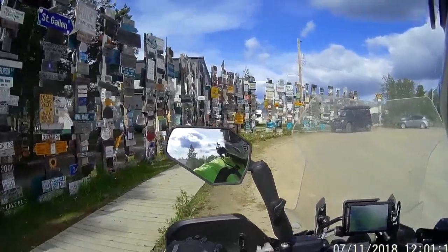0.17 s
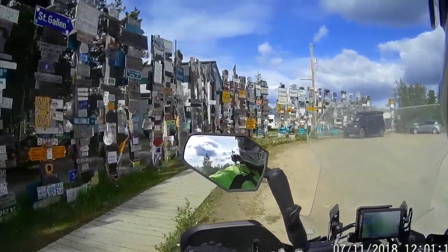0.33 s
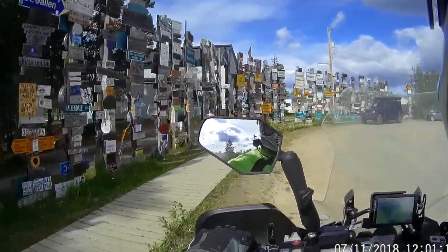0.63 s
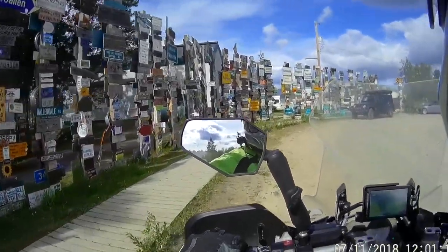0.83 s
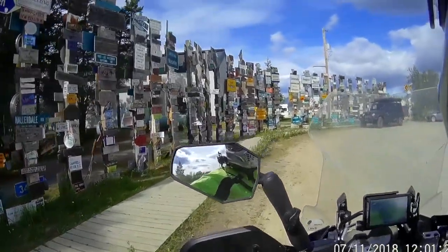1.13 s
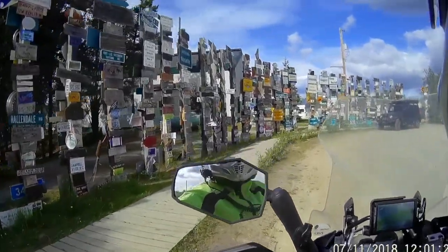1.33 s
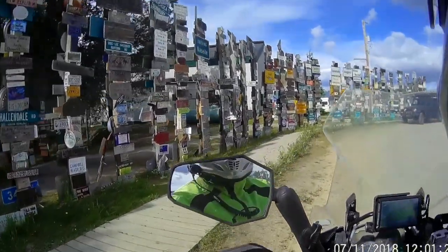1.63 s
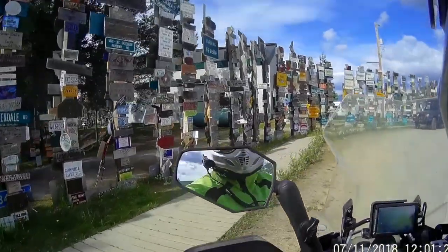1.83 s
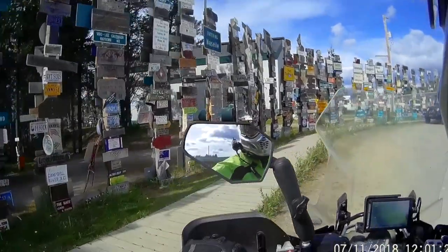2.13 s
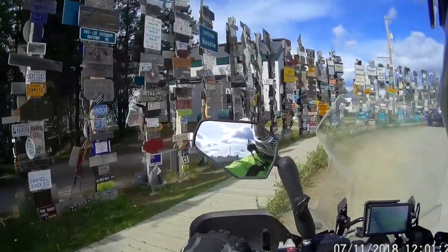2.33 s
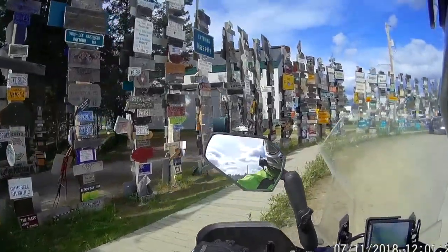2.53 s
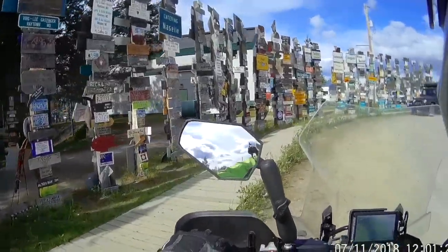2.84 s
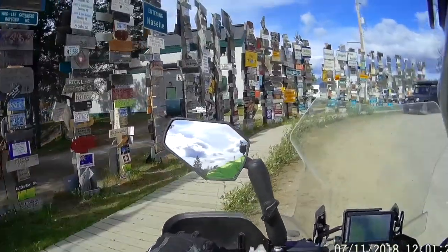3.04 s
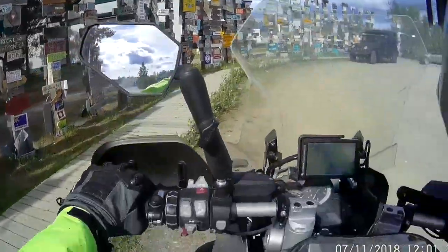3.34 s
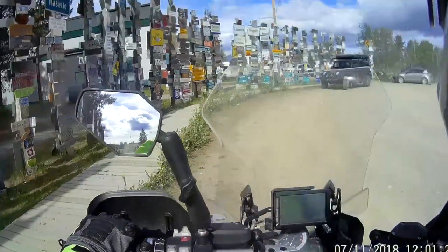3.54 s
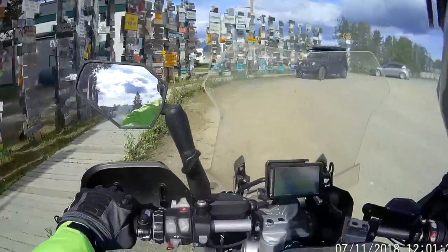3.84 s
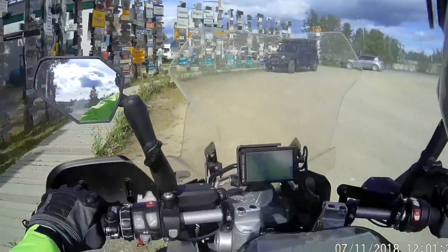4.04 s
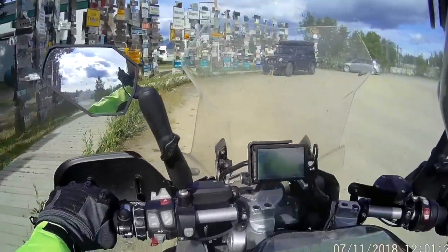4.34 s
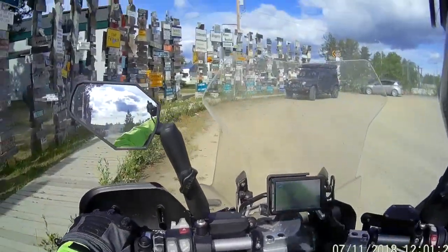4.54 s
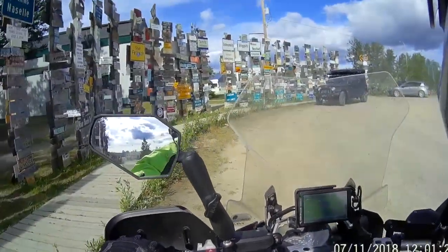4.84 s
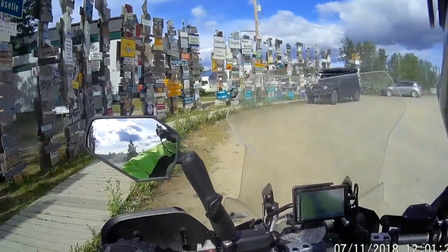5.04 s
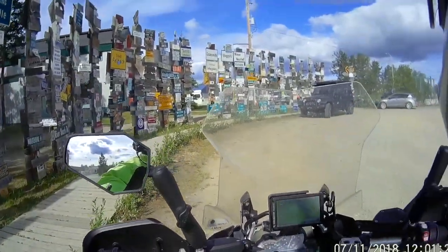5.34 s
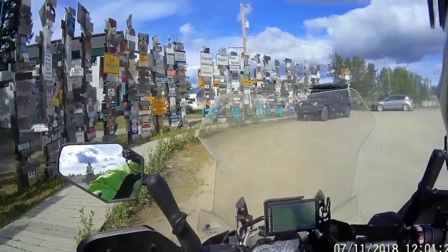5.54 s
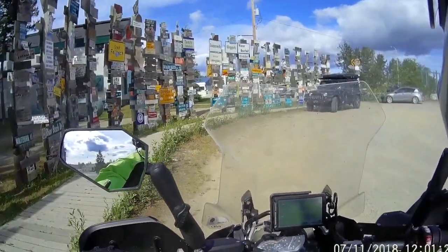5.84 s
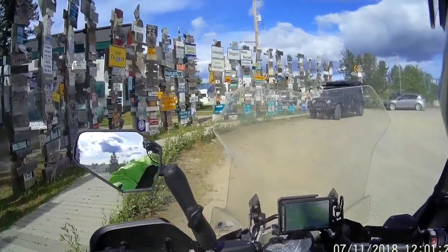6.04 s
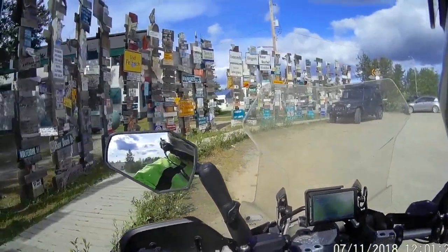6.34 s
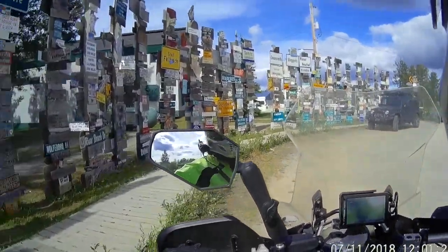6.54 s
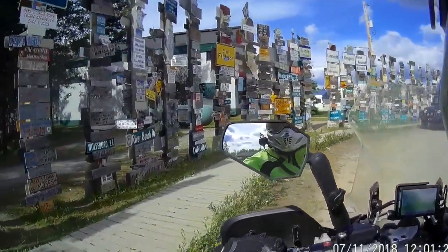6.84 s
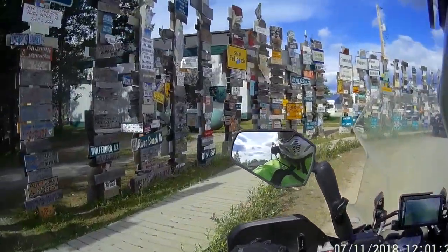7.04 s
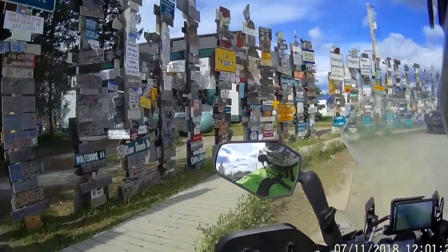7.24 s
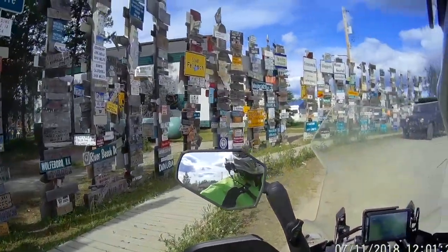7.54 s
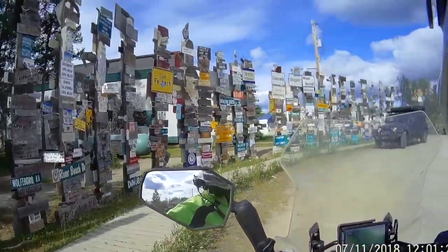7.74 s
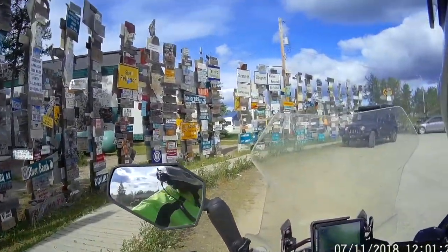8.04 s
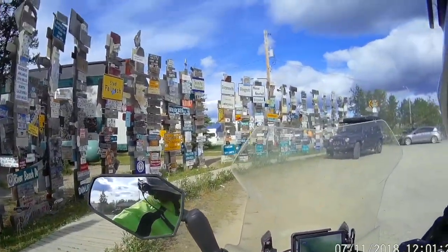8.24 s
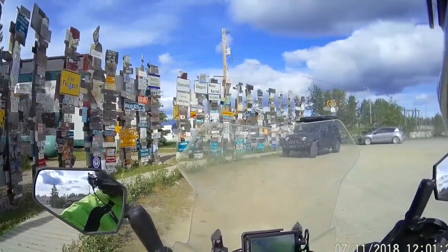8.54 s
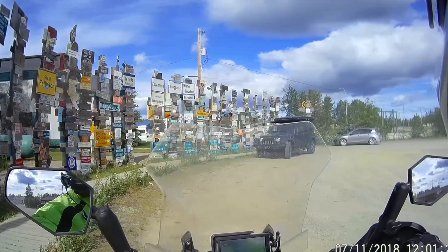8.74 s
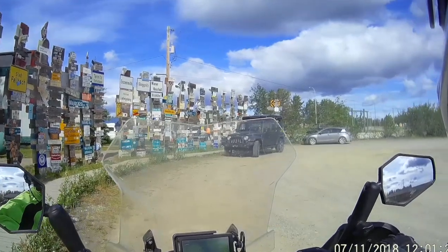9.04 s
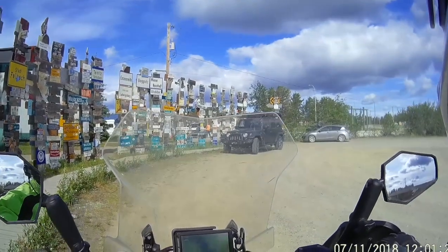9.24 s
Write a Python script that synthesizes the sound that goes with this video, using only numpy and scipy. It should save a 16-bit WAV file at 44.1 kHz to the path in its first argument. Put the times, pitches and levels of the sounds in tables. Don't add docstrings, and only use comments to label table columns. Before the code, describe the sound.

A twin-cylinder motorcycle idles close below a cased helmet microphone outdoors: soft bassy exhaust puffs around nineteen a second, airbox gulps, valve clatter, thin gear whine and rattling fins. Light wind buffets low. After six seconds comes one small blip; near the end the ignition is cut, the engine quickly runs down, and faint bumps fade into hiss.

```python
import sys
import numpy as np
from scipy import signal
from scipy.fft import rfft, irfft, next_fast_len
from scipy.io import wavfile
from scipy.ndimage import uniform_filter1d, map_coordinates

SR = 44100
rng = np.random.default_rng(int(sys.argv[2]) if len(sys.argv) > 2 else 0)


def gain_from_db(level_db):
    decades = np.asarray(level_db, float) / 20
    return 10 ** decades


def generate_wav(signal):
    frames = np.transpose(np.atleast_2d(signal))
    scaled = np.clip(frames, -1, 1) * 32767
    pcm = np.round(scaled).astype(np.int16)
    wavfile.write(sys.argv[1], SR, pcm)


N = 413658


def unit(x):
    return x / np.sqrt(np.mean(x ** 2) + 1e-20)


def curves(rows):
    s, *columns = np.transpose(rows)
    return [np.interp(np.arange(N) / SR, s, c, left=-120, right=-120) for c in columns]


def spells(rows):
    t = np.arange(N) / SR
    return sum(db * np.exp(-.5 * ((t - s) / length) ** 2) for s, db, length in rows)


def wobble(rate):
    knots = rng.standard_normal(int(N * rate / SR) + 4)
    return map_coordinates(knots, [np.arange(N) * rate / SR])


def filtered(x, response):
    m = next_fast_len(N + SR // 2)
    hz = np.fft.rfftfreq(m, 1 / SR) + 1e-3
    return irfft(rfft(x, m) * response(hz), m)[:N]


def coloured(points):
    f, db = np.transpose(points)
    gain = lambda hz: gain_from_db(np.interp(np.log(hz), np.log(f), db, left=-120, right=-120))
    return unit(filtered(rng.standard_normal(N), gain))


def resonated(x, modes):
    def body(f):
        total = 0
        for k, (centre, width, db) in enumerate(modes):
            ring = 1j * f * width / (centre * centre - f * f + 1j * f * width)
            total = total + (-1) ** k * gain_from_db(db) * ring
        return total
    return unit(filtered(x, body))


def steep(ratio, order):
    poles = [np.exp(1j * np.pi * (2 * k + order + 1) / (2 * order)) for k in range(order)]
    return 1 / np.prod([1j * ratio - pole for pole in poles], axis=0)


# start_s, crank_turns_per_s
SPEED = [(0.0, 19.196), (1.28, 18.844), (1.57, 19.948), (1.85, 18.327), (1.99, 19.605), (2.42, 18.937),
         (2.71, 19.434), (3.99, 18.829), (4.13, 20.841), (4.27, 19.359), (5.13, 19.902), (5.27, 16.371),
         (5.55, 19.965), (6.12, 18.043), (6.26, 19.744), (7.69, 18.989), (7.83, 19.259), (8.4, 19.011)]
START_TURN = -.512
BLIP_S, CLUTCH_S, BLIP_GAIN = 6.368, 6.569, 31.54
OFF_S, COAST_S, COAST_BEND = 8.305, .473, 2.863


def shaft():
    t = np.arange(-SR // 10, N) / SR
    blip = BLIP_GAIN * (t - BLIP_S) * (t > BLIP_S) * (t < CLUTCH_S)
    coast = 1 - np.clip((t - OFF_S) / COAST_S, 0, 1) ** COAST_BEND
    speed = (np.interp(t, *np.transpose(SPEED)) + blip) * coast
    turns = np.cumsum(speed) / SR
    return t, turns - turns[SR // 10] + START_TURN


def crank():
    s, turns = shaft()
    return uniform_filter1d(np.interp(np.arange(N) / SR, s, turns), size=2500)


def beats(angle, every, scatter_db, jitter_s=0):
    s, turns = shaft()
    at = np.interp(np.arange(angle % every - every, turns[-1], every), turns, s)
    size, late = rng.standard_normal((len(at), 2)).T
    at = at + jitter_s * late
    heard = at >= 0
    return np.bincount((at[heard] * SR).astype(int), gain_from_db(scatter_db * size)[heard], 2 * N)[:N]


def strikes(events, scatter_db, jitter_s):
    return sum(gain_from_db(db) * beats(angle, 2, scatter_db, jitter_s) for angle, db, _ in events)


def cam_gate(events, scatter_db, between_db):
    gate = np.full(N, gain_from_db(between_db))
    for angle, db, t60 in events:
        fall = gain_from_db(-60 / (t60 * SR))
        gate += gain_from_db(db) * signal.lfilter([1], [1, -fall], beats(angle, 2, scatter_db))
    return gate


def whine(order, ripple, blur, unloading):
    angle = crank()
    surge = -ripple / (2 * np.pi) * np.sin(2 * np.pi * (angle - .45))
    contact = 1 - unloading * np.exp(8 * (np.cos(2 * np.pi * (angle - .27)) - 1))
    load = contact * (1 + .3 * np.cos(np.pi * (angle - 1.9))) * gain_from_db(.8 * wobble(30))
    return unit(load * np.sin(2 * np.pi * order * (angle + surge) + blur * wobble(45)))


def exhaust():
    ahead = lambda x, s: np.roll(x, -round(s * SR))
    puffs = ahead(beats(0, 1, scatter_db=.8), .011) + .28 * beats(.28, 1, scatter_db=1.3)
    jolts = ahead(beats(0, 1, scatter_db=1), .0207)
    shake = filtered(jolts, lambda f: 23.5j * f / (62.7 ** 2 - f * f + 23.5j * f))

    def edges(hz):
        muffler = steep(hz / 104.8, 6) / (1 + (hz / 156) ** 12)
        microphone = np.conj(steep(35.4 / hz, 4))
        return muffler * microphone
    return unit(filtered(puffs + .96 * shake, edges))


# turns_after_puff, level_db, t60_s
INTAKE = [(.76, 0, .06), (1.76, -2.5, .06), (.25, -7, .07), (1.3, -10, .07)]
# centre_hz, width_hz, level_db
AIRBOX = [(212.3, 45.93, 0), (254.27, 60.5, -0.5), (298.4, 60.6, -5.5), (390.5, 65.8, -7.5),
          (469.5, 34.6, -4.5), (518.7, 60.8, -11)]


def intake():
    breath = resonated(cam_gate(INTAKE, 1.0, between_db=-9) * rng.standard_normal(N), AIRBOX)
    gulps = resonated(strikes(INTAKE, .8, .0006), AIRBOX[:3])
    throttle_db = .8 * np.clip(np.gradient(crank()) * SR - 19.8, 0, 5)
    return gain_from_db(throttle_db) * unit(breath + .85 * gulps)


# centre_hz, width_hz, level_db
PANEL = [(423.73, 18.8, 1), (452.5, 24.5, -8), (508.6, 12, -14)]


def panel():
    kicks = beats(.9, 2, .8, .0003) + .45 * beats(1.62, 2, 1.5, .0008)
    swells = resonated(resonated(kicks, [(432, 60, 0)]), PANEL)
    cam_drive = resonated(whine(order=22, ripple=.015, blur=.4, unloading=.2), PANEL)
    shaking = resonated(rng.standard_normal(N), PANEL)
    return unit(swells + .75 * cam_drive + .3 * shaking)


# start_s, share (0-1)
FACING = [(0, 0.24), (3.3, 0.68), (3.8, 0.76), (5.1, 0.72), (5.6, 0.59), (9.38, 0.16)]


def facing():
    return np.clip(curves(FACING)[0], 0, 1)


# turns_after_puff, level_db, t60_s
VALVES = [(.37, 0, .07), (1.38, -4, .07), (.7, -6, .09), (1.7, -5, .09)]
# centre_hz, width_hz, level_db
CASES = [(713.6, 180, -13), (924.2, 106.9, -6), (1102.8, 46.5, -2.5), (1207.7, 44.1, -4), (1361, 226, -11),
         (1655, 127.2, -10), (1882, 130, -10), (2194, 217, -15)]
COVER = [(1108, 55, 0), (1420, 200, -14)]
HOUSING = [(1190, 330, 0), (1420, 150, -3)]
KNOCK_FACING_DB, WHINE_FACING_DB = 3.5, -6


def cases(gate):
    turned = facing() - .4
    clatter = resonated(gate * rng.standard_normal(N), CASES)
    knock = resonated(strikes(VALVES[:2], 1.1, .0004), COVER)
    primary = resonated(whine(order=60, ripple=.045, blur=.6, unloading=.85), HOUSING)
    return (gain_from_db(-3.4) * clatter
            + gain_from_db(-8.1 + KNOCK_FACING_DB * turned) * knock
            + gain_from_db(-5.9 + WHINE_FACING_DB * turned) * primary)


# pitch_hz, level_db
FINS = [(1410, -41.5), (2550, -6), (3090, 0), (3400, -7), (3860, -6.5), (6300, -14), (12600, -14.5),
        (14200, -22.5)]
# centre_hz, width_hz, level_db
BRIGHT_SIDE = [(3756, 230, 5), (4582, 220, -6)]


def fins(gate):
    bright = resonated(rng.standard_normal(N), BRIGHT_SIDE)
    metal = coloured(FINS) + 0.515 * facing() * bright
    return unit((gate + 1.6) * gain_from_db(1.26 * wobble(60)) * metal)


# start_s, effort_db
LOAD = [(0, -0.5), (.3, -0.5), (1.45, -0.12), (1.64, 5), (1.8, 0), (2.55, 0), (2.7, 5), (2.9, 3),
        (3.25, -0.04), (4.0, 0.46), (4.6, 1), (5.13, 0.52), (5.32, -3.5), (5.6, 0), (6.6, 0.84),
        (7.35, 0.93), (8.0, 0.39), (8.5, -0.5)]
# centre_s, level_db, length_s
MIXTURE = [(0.037, 3, 0.037), (0.193, -2.5, 0.048), (0.978, -2, 0.038), (1.825, -1.5, 0.04033),
           (2.326, -1.5, 0.039), (2.53, -1, .05), (3.303, -0.5, 0.056), (4.005, -2, 0.034),
           (4.322, -3, 0.0324), (4.52, 1, 0.064), (6.254, -3, 0.0815), (6.786, -1.5, 0.04),
           (6.968, 1, 0.041), (7.08, -2, 0.045), (7.307, 0.5, 0.0453), (7.423, 0, 0.043),
           (8.169, -2.5, 0.082), (8.43, 1, 0.04)]
# start_s, share (0-1.2)
LEANING = [(0, 0.15), (2.55, 0.31), (2.85, 0.88), (4.8, 0.47), (5.1, 1), (6.3, 1.13), (6.55, 0.82),
           (7.1, 0.62), (7.5, 1.2), (9.38, 0.6)]
# idle_db, db_per_effort_db, db_per_turn_per_s over idle, dies_from_s, dying_db_per_s
LAYERS = [
    (-40, 0.7537, 0.5, 8.44, 66.5),
    (-57.5, 0.8459, 1, 8.495, 84),
    (-58, 0.7832, 1.15, 8.53, 111),
    (-57.5, 1, -0.37, 8.55, 130),
    (-70.5, 1, 0.22, 8.56, 160.5),
]
POSTURE = [
    (0, -0.9),
    (2, -1),
    (4, -1),
    (0, 1.5127),
    (-3, 1.22),
]
COASTING_DB = [23, 19.8, 18, 13.9, 16.6]
IDLE, SURGE_CAP = 19.26, 1.3
UNEVEN_DB, STANDS_DB = 0.2851, 300


def levels():
    t = np.arange(N) / SR
    effort = np.interp(t, *np.transpose(LOAD)) + spells(MIXTURE)
    faster = np.clip(np.gradient(crank()) * SR - IDLE, -3, SURGE_CAP) * (t < OFF_S)
    posture_db = np.dot(POSTURE, np.clip(curves(FACING) + curves(LEANING), 0, None))
    standing_db = STANDS_DB * np.clip(t - OFF_S - COAST_S, 0, None)
    faders = []
    for layer, seat_db, coasting_db in zip(LAYERS, posture_db, COASTING_DB):
        idle_db, grows, per_turn, dies_s, dying = layer
        running_db = idle_db + grows * effort + per_turn * faster + seat_db + UNEVEN_DB * wobble(9)
        faders.append(running_db - np.clip(dying * (t - dies_s), 0, coasting_db) - standing_db)
    return faders


# centre_s, level_db, length_s
KNEE = [(.7, -2, 0.073), (1.6, 1.5, 0.063), (1.84, -4, 0.05), (3.35, -5, .2), (5.85, 3, 0.2),
        (7.45, -4.5, 0.092), (7.82, 3, 0.049), (8.05, -1, 0.056)]


def engine():
    exhaust_db, intake_db, panel_db, cases_db, fins_db = levels()
    gate = uniform_filter1d(cam_gate(VALVES, 1.0, between_db=-4), size=60)
    return (gain_from_db(exhaust_db - .7) * exhaust()
            + gain_from_db(intake_db) * intake()
            + gain_from_db(panel_db + spells(KNEE)) * panel()
            + gain_from_db(cases_db) * cases(gate)
            + gain_from_db(fins_db - 0.0042) * fins(gate))


# centre_s, peak_db, pitch_hz,
# length_cycles
BUMPS = [(.035, -40, 48.6, 1.57), (2.622, -35, 48, 1.12), (2.653, -31, 111, 0.69), (2.688, -43, 105, 1.5),
         (6.568, -36, 96.3, 1.65), (8.733, -47.5, 58, 0.76), (8.802, -51.5, 40, 1.06),
         (8.855, -56.5, 60, 1), (8.888, -48, 90.5, 1.04), (8.927, -45, 31.4, 1), (8.969, -60, 42, 1),
         (9.087, -57, 33, 0.65), (9.135, -57.5, 42, 1.08), (9.165, -58.5, 44.2, 1.4),
         (9.201, -60.5, 75, 0.94)]


def bumps():
    t = np.arange(N) / SR
    out = np.zeros(N)
    for s, db, hz, cycles in BUMPS:
        near = slice(max(round(s * SR) - 4000, 0), round(s * SR) + 4000)
        turn = (t[near] - s) * hz
        out[near] += gain_from_db(db) * np.exp(-2 * (turn / cycles) ** 2) * np.cos(2 * np.pi * turn)
    return out


# start_s, level_db
SETTLE = [(8.6, -61), (8.95, -65), (9.2, -70.5), (9.38, -76.5)]
# pitch_hz, level_db
ROCK = [(10, -19), (25, 0), (45, -2), (100, -15), (160, -23.5), (400, -33.5)]


def settling():
    return gain_from_db(curves(SETTLE)[0] + 2.0) * coloured(ROCK)


# start_s, peak_db, centre_hz
CLICKS = [(3.389, -51.5, 750), (3.489, -47, 750), (5.399, -63, 10500), (8.585, -66, 1500),
          (8.64, -70, 1800), (8.625, -62, 1600), (8.785, -70, 2500), (8.88, -62, 170), (8.9, -58, 230),
          (8.94, -69, 700), (8.987, -67.5, 2000)]


def clicks():
    out, t = np.zeros(N + SR), np.arange(SR // 20) / SR
    for s, db, hz in CLICKS:
        band = [hz * .6 / SR * 2, min(hz * 1.4 / SR * 2, .9)]
        b, a = signal.butter(2, band, "band")
        burst = unit(signal.lfilter(b, a, rng.standard_normal(len(t)))) * gain_from_db(-60 * t / 0.092)
        out[round(s * SR):][:len(t)] += gain_from_db(db - 3.5) * burst
    return out[:N]


# peak_s, peak_db, fall_s per 10 dB
GUSTS = [(0, -53.5, 0.23), (.27, -58, 0.06), (.57, -57, 1), (.75, -59, 1.68), (1.55, -51, 0.24),
         (1.68, -55.5, 0.02), (2.59, -49.5, 0.11), (2.72, -58, .5), (4.43, -61.5, 0.66),
         (4.76, -64.5, -0.66), (5.13, -58.5, -0.2), (5.6, -57, -0.33), (6.52, -48.5, 0.1758),
         (7.45, -61, 0.7), (7.69, -63, 0.38)]
GUST_RISE_S, CALM_DB = 0.0667, -67.5


def gusts():
    t = np.arange(N) / SR
    power = gain_from_db(2 * CALM_DB)
    for s, db, fall in GUSTS:
        away = np.maximum((s - t) / GUST_RISE_S, (t - s) / abs(fall))
        power = power + gain_from_db(2 * db - 20 * away)
    return np.sqrt(power) * (t < SETTLE[0][0])


# pitch_hz, level_db
GUST = [(8, -40), (22, -1), (60, -1.5), (110, -1.5), (165, -14.5), (250, -16), (500, -38)]


def wind():
    return gain_from_db(9.0) * gusts() * unit(gain_from_db(2.12 * wobble(12)) * coloured(GUST))


# pitch_hz, level_db
HISS = [(88, -27), (150, -6), (237, -2), (271, -1), (3400, -8.5), (11500, -9), (13100, -9), (14200, -19)]


def hiss():
    return gain_from_db(-75.5) * coloured(HISS)


def scene():
    return (engine() + bumps() + settling() + clicks() + wind())[None]


def top_cut(x):
    return signal.sosfilt(signal.butter(12, 14310, fs=SR, output="sos"), x)


def record(dry):
    mix = dry + hiss()
    return top_cut(mix)


dry = scene()
out = record(dry)
generate_wav(out)
```